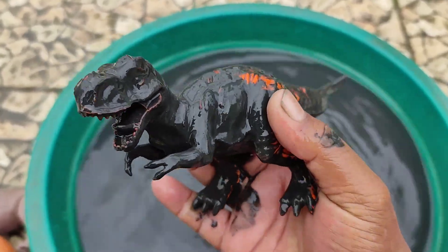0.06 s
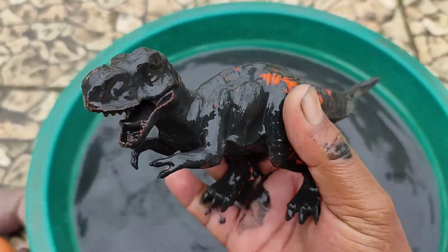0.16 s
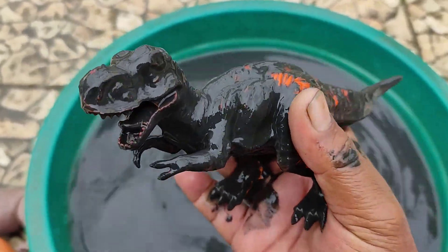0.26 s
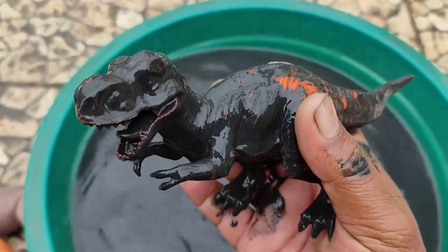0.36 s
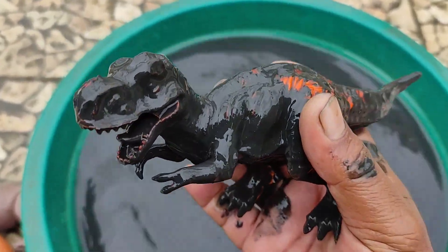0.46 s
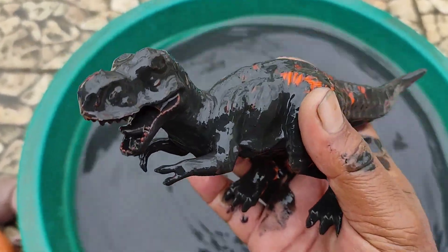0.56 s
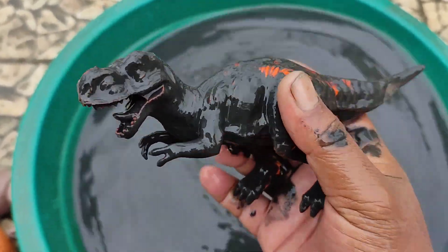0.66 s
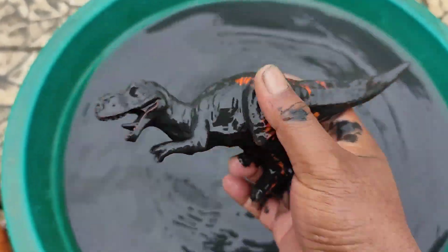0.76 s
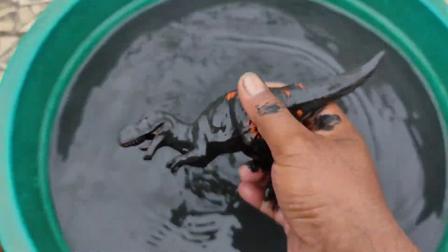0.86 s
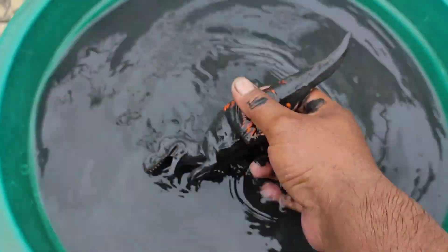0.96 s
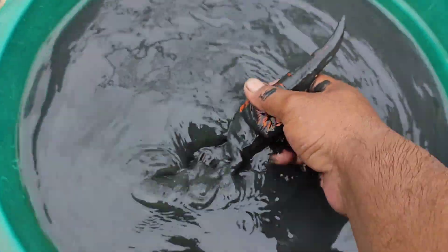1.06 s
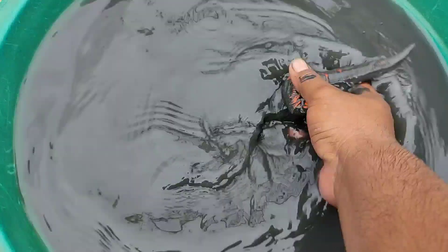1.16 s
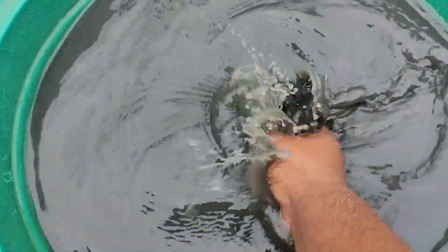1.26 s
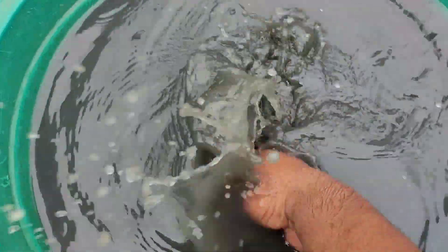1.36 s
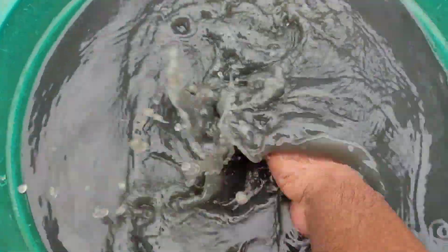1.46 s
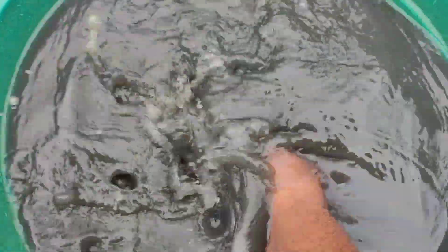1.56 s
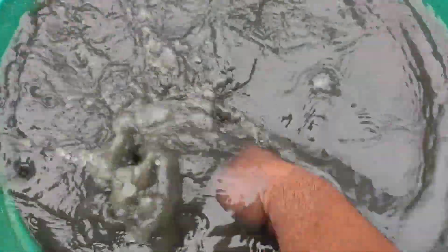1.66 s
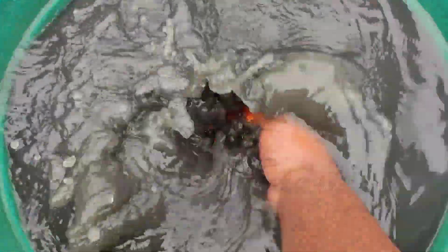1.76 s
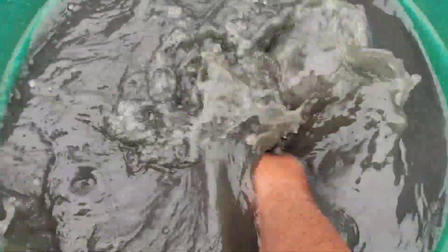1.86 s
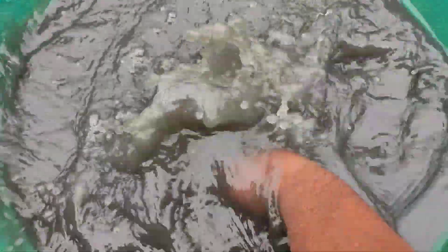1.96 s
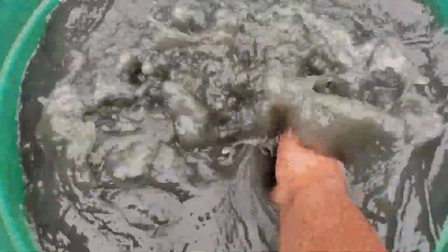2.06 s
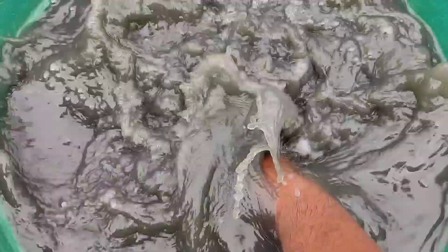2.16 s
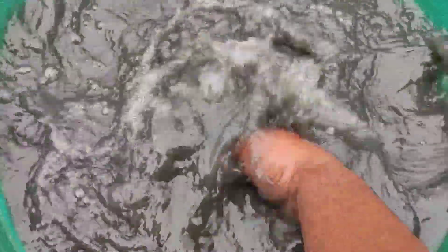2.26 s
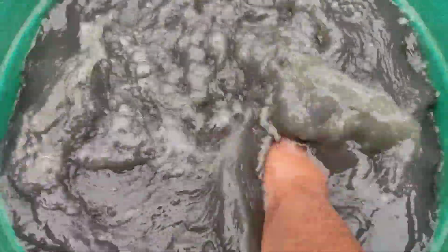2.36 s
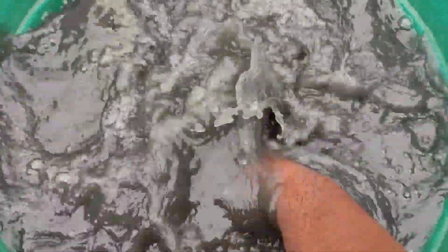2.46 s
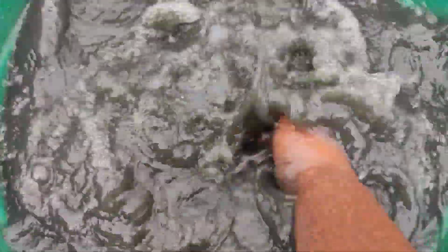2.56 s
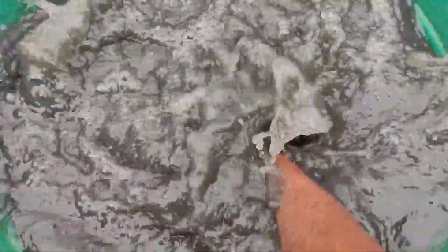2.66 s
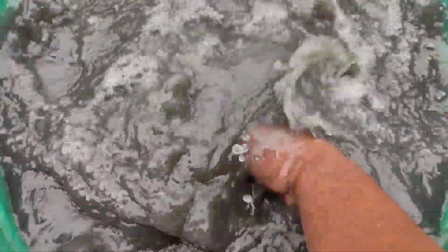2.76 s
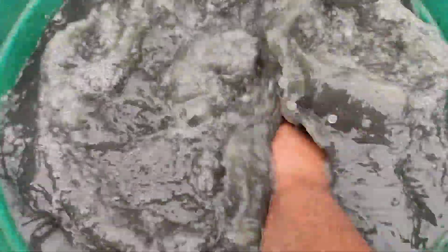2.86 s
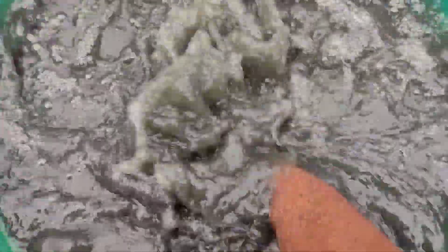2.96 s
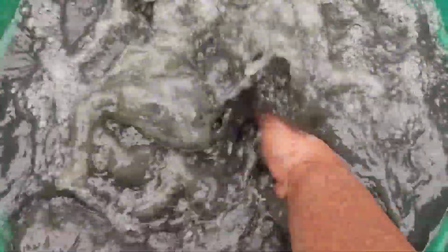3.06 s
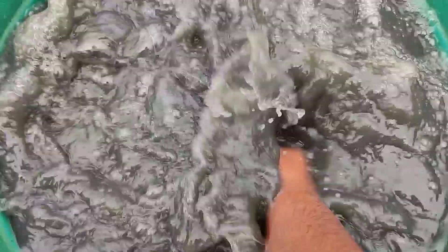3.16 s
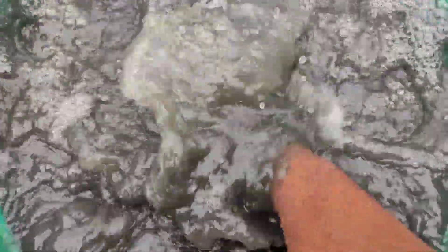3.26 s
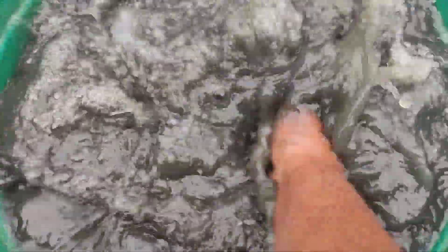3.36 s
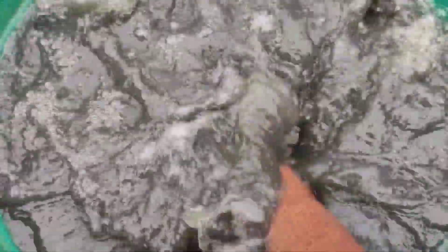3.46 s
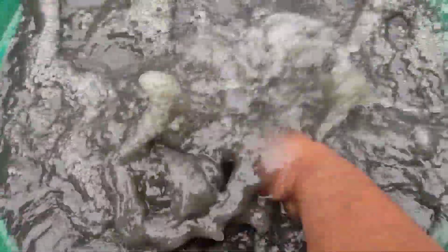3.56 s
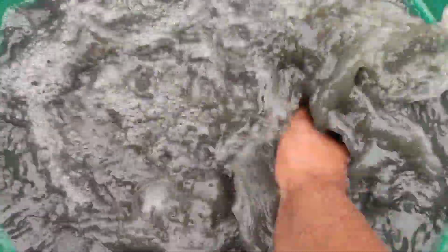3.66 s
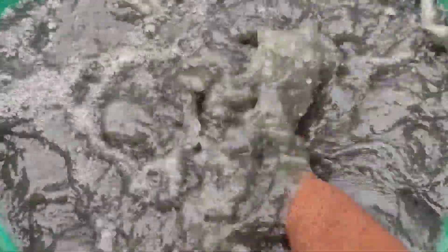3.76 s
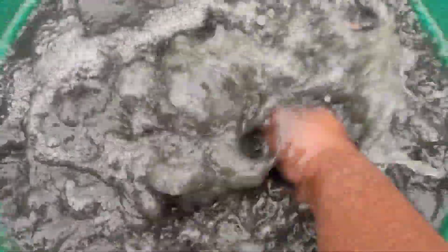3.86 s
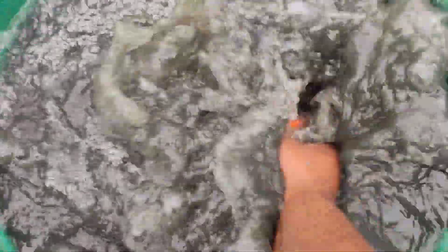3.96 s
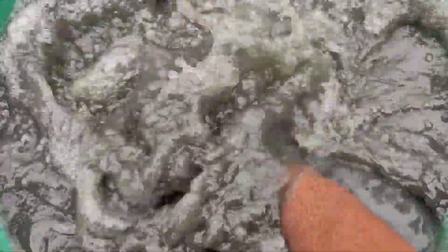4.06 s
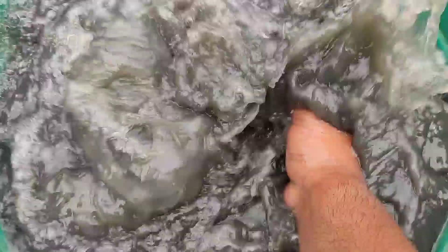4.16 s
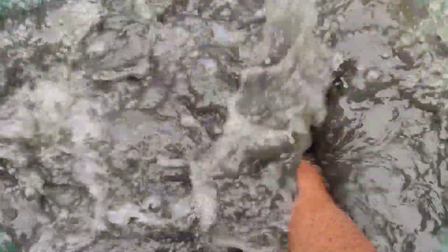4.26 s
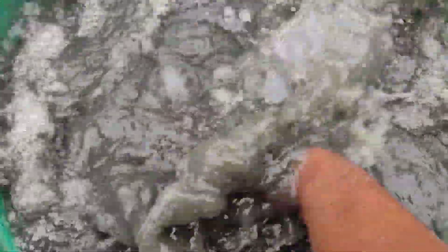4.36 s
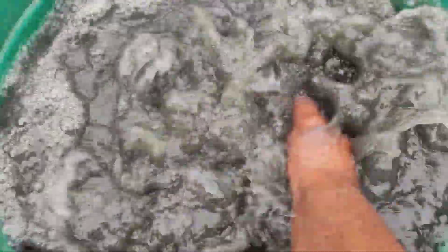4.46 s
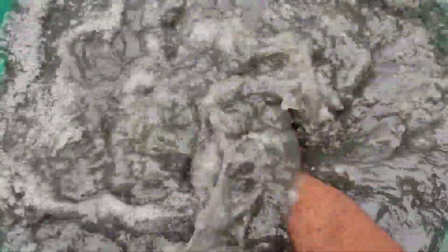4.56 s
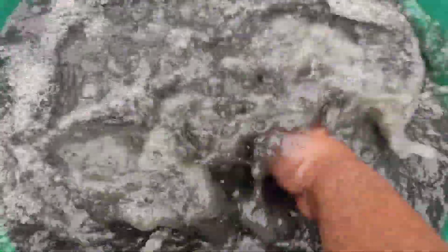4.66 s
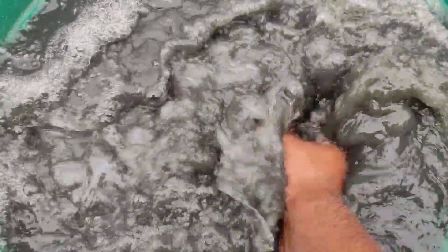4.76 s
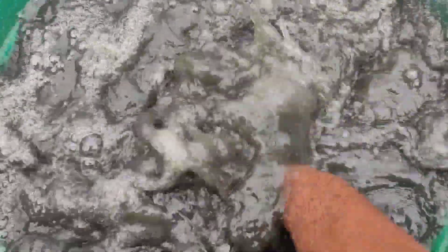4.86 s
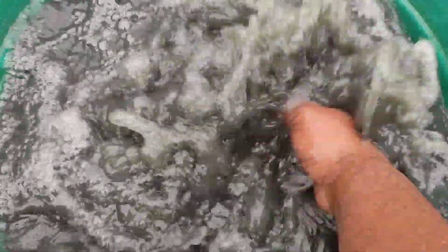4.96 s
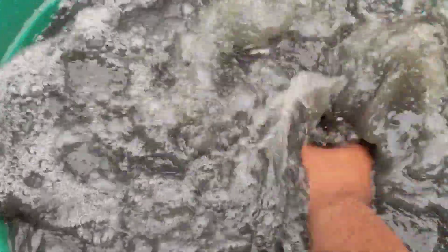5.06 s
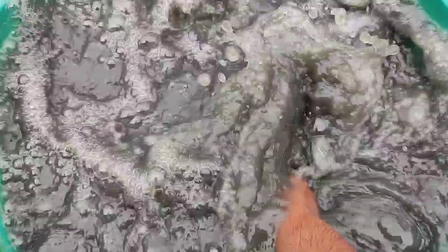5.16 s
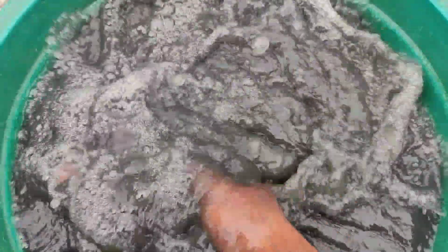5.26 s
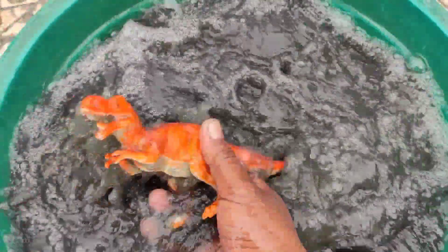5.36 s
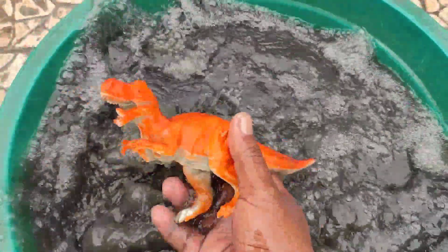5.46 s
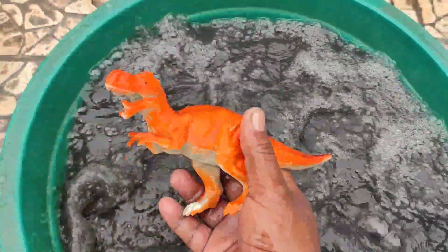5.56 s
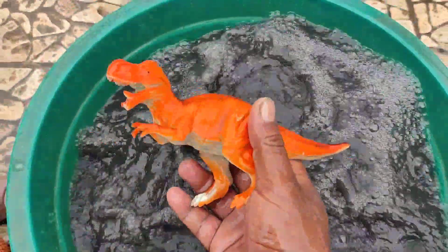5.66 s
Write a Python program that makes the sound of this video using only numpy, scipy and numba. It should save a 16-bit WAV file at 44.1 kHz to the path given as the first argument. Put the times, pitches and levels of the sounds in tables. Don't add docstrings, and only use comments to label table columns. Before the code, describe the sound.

A hand plunges a toy into a basin and churns the water, with bubbling gurgles, sharp slaps and fizzing spray, close up.

```python
import sys
import numpy as np
from scipy import signal
from scipy.fft import rfft, irfft
from scipy.io import wavfile
from scipy.ndimage import map_coordinates
from numba import njit

SR = 44100
rng = np.random.default_rng(int(sys.argv[2]) if len(sys.argv) > 2 else 0)


def transcribe(u):
    v = np.clip(np.atleast_2d(u).T, -1, 1)
    q = np.round(v * 32767).astype(np.int16)
    wavfile.write(sys.argv[1], SR, q)


def boost_factor(decibels):
    exponent = np.asarray(decibels, float) / 20
    return 10 ** exponent


N = 252516
LEFT_LAG_S, LAG_SPREAD_S = 0.00013, 0.00008


def in_time(rows):
    s, *columns = np.transpose(rows)
    return [np.interp(np.arange(N) / SR, s, c) for c in columns]


def at_hz(points, hz):
    point_hz, point_db = np.transpose(points)
    return np.interp(np.log(hz), np.log(point_hz), point_db)


def rms_one(x):
    return x / np.sqrt(np.mean(x ** 2) + 1e-20)


def filtered(x, order, hz, kind):
    return signal.sosfilt(signal.butter(order, hz, kind, fs=SR, output="sos"), x)


def halves(x, hz):
    return [rms_one(filtered(x, 3, hz, kind)) for kind in ("low", "high")]


def drift(per_s):
    r = np.exp(-2 * np.pi * per_s / SR)
    noise = rng.standard_normal(N + SR)
    return rms_one(signal.lfilter([1], [1, -2 * r, r * r], noise)[SR:])


def coloured(spectrum, alike, lag_s):
    hz = np.maximum(np.arange(N // 2 + 1) * SR / N, 1)
    shared, left, right = rfft(rng.standard_normal((3, N)))
    own = np.sqrt(1 - np.clip(alike, 0, 1))
    common = np.sqrt(np.clip(alike, 0, 1))
    late = np.exp(-2j * np.pi * hz * lag_s)
    pair = np.array([common * shared * late + own * left, common * shared + own * right])
    return rms_one(irfft(pair * boost_factor(at_hz(spectrum, hz)), N))


@njit
def ring(rows, n, sr):
    out = np.zeros((2, n))
    for s, height, hz, cycles, rise, swell, lag, left in rows:
        life = cycles / hz
        for side in range(2):
            start = (s + lag * (1 - side)) * sr
            gain = height * (left if side == 0 else 1 / left)
            for i in range(int(start) + 1, min(n, int(start + life * sr))):
                t = (i - start) / sr
                shape = (1 - np.exp(-t * hz / swell)) * np.exp(-np.log(1000) * t / life)
                out[side, i] += gain * shape * np.sin(2 * np.pi * hz * t * (1 + rise * t / life))
    return out


def bubbles(s, level_db, hz, cycles, rise, swell, pan_db):
    spot = rng.standard_normal((len(s), 2))
    swell, cycles = np.maximum(swell, 0.05), np.maximum(cycles, 1.5)
    top = swell * np.log(1 + cycles / swell / np.log(1000))
    peak = (1 - np.exp(-top / swell)) * 1000.0 ** (-top / cycles)
    height = boost_factor(level_db) / peak
    lag_s = LEFT_LAG_S + LAG_SPREAD_S * spot[:, 0]
    left = boost_factor((pan_db + 0.5 * spot[:, 1]) / 2)
    columns = np.broadcast_arrays(s, height, hz, cycles, rise, swell, lag_s, left)
    return ring(np.transpose(columns).copy(), N, SR)


# pitch_hz, level_db (per Hz)
RUMBLE_COLOUR = [(15, -68), (25, -77), (48, -15.5), (177, 1.5), (339, -13), (374, -11.5), (461, -26),
                 (509, -30), (598, -24.5), (1200, -53), (1560, -74), (2640, -120)]
# time_s, level_db
RUMBLE_LEVEL = [
    (0.0, -45),
    (1.15, -43.5),
    (1.47, -52),
    (5.73, -50.5),
]
# pitch_hz, level_db (per Hz)
HISS_COLOUR = [(530, -1), (900, -3.5), (1020, -4), (1190, -8), (1380, -5), (2140, -12), (3650, -11.5),
               (5650, -18.5), (6790, -13), (7660, -12.5), (9660, -3.5), (10400, -19), (11300, -10),
               (14800, -30), (16500, -43)]


def surroundings():
    rumble_db, = in_time(RUMBLE_LEVEL)
    rumble = boost_factor(rumble_db + 5) * coloured(RUMBLE_COLOUR, alike=0.93, lag_s=0)
    hiss = boost_factor(-50) * coloured(HISS_COLOUR, alike=0, lag_s=0)
    return rumble + hiss


# crest_s, spray_db, gurgle_db (against the spray), build_up_s, fall_s
STROKES = [(0.689, -43, -4.5, 0.067, 0.25), (1.12, -46, -4, 0.14, 0.44), (1.35, -42, -6, 0.092, 0.14),
           (1.489, -31, 3, 0.13, .08), (1.661, -35.5, 4.5, .14, 0.16), (1.911, -35, 6.5, 0.18, 0.16),
           (2.181, -35.5, 3.5, 0.18, 0.73), (2.461, -33.5, 4.5, 0.055, 0.15), (2.56, -42, -10, 0.26, 0.096),
           (2.71, -37.5, -2, 0.078, 0.23), (2.83, -39, 2.5, 0.18, 0.3), (2.98, -36, 0, .1, 0.66),
           (3.18, -41.5, 6, 0.37, 1), (3.48, -39, 5, 0.17, 0.11), (3.57, -32, 2, 0.074, 0.12),
           (3.81, -34, 5, 0.19, 0.28), (4.1, -29.5, 3.5, 0.17, 0.087), (4.37, -28.5, 4.5, 0.27, 0.14),
           (4.58, -30.5, 3.5, 0.12, 0.41), (4.88, -31.5, -1, 0.12, 0.18), (5.05, -37.5, 7.5, 0.22, 0.27),
           (5.158, -27.5, 2.5, 0.074, 0.14), (5.5, -43, 4.5, 0.54, 0.29), (5.66, -41, -10, 0.44, .6)]


def strokes(level_db, bed_db):
    slope_db = 20
    power, t = boost_factor(2 * bed_db), np.arange(N) / SR
    for db, (crest_s, _, _, rise_s, fall_s) in zip(level_db, STROKES):
        away = np.maximum((crest_s - t) / rise_s, (t - crest_s) / fall_s)
        power = power + boost_factor(2 * (db - slope_db * away))
    return 10 * np.log10(power)


def swarm(count, spectrum, low_hz, high_hz, cycles, size_db, clump_db, clump_per_s):
    when, pitch, luck, length = rng.random((count, 4)).T
    hz = low_hz * (high_hz / low_hz) ** pitch
    clumps = np.array([drift(clump_per_s) for _ in range(3)])
    clump = map_coordinates(clumps, [2 * pitch, when * (N - 1)], order=1)
    size = -size_db * np.log(np.maximum(luck, 0.01)) + clump_db * clump
    level_db = at_hz(spectrum, hz) + 20 * np.log10(hz) + size
    cycles = cycles * (0.36 + 1.97 * length)
    return rms_one(bubbles(when * N / SR, level_db, hz, cycles, rise=0.16, swell=0.58, pan_db=-1.7))


# pitch_hz, level_db (per Hz)
SPRAY_COLOUR = [(1120, 2.5), (1900, 0.5), (2540, -1), (3240, -0.5), (4610, -3.5), (5000, -7.5), (6620, -8),
                (7180, -13.5), (8680, -2.5), (10000, -8), (11600, -2), (14900, -20.5), (15900, -15),
                (16500, -51)]


def spray_noise(alike):
    return rms_one(filtered(coloured(SPRAY_COLOUR, alike, LEFT_LAG_S), 3, 1100, "high"))


# pitch_hz, level_db (per Hz)
GURGLE_COLOUR = [(71, -56), (120, -18), (167, -5.5), (211, -9), (279, -6), (378, 0.5), (442, 0),
                 (599, -6.5), (711, -1.5), (1370, -8), (1670, -3.5), (1890, -24.5), (2800, -16),
                 (3640, -52), (6160, -120)]
# time_s, slosh_db, depth_db (deep bubbles as the hand sinks in)
SLOSH = [(0.0, -68.5, -7), (0.95, -67, -5), (1.3, -54, 2), (1.56, -49, -21), (1.8, -48.5, 0),
         (2.1, -41, 4.5), (2.9, -40.5, 4.5), (3.5, -40, -1.5), (3.95, -35, 5), (4.45, -36.5, 1.5),
         (5.0, -38.5, 3.5), (5.28, -46, 6), (5.45, -44.5, -23), (5.73, -50, -24)]


def churned_water():
    slosh_db, depth_db = in_time(SLOSH)
    _, crest_db, body_db, _, _ = np.transpose(STROKES)
    gurgle_db = strokes(crest_db + body_db, slosh_db)
    spray_db = strokes(crest_db, slosh_db - 11)
    deep_follows = 0.47
    depth_db = depth_db - (1 - deep_follows) * (gurgle_db - slosh_db)

    gurgle = swarm(count=5000, spectrum=GURGLE_COLOUR, low_hz=140, high_hz=2600, cycles=24,
                   size_db=3, clump_db=2.5, clump_per_s=25)
    wash = coloured(GURGLE_COLOUR, alike=0.85, lag_s=LEFT_LAG_S) * boost_factor(-9 + 2.5 * drift(18))
    deep, shallow = halves(gurgle + wash, 600)

    fizz = swarm(count=22000, spectrum=SPRAY_COLOUR, low_hz=1900, high_hz=12500, cycles=28,
                 size_db=3.5, clump_db=4.5, clump_per_s=22)
    flutter_db = 3 * drift(14) + 2.5 * drift(60) + 2 * drift(150)
    mist = spray_noise(alike=0.45) * boost_factor(-1 + flutter_db)

    low = boost_factor(gurgle_db + 1.3) * (shallow + boost_factor(depth_db) * deep)
    high = boost_factor(spray_db + 1.0) * (fizz + mist)
    return low + high


# start_s, level_db (peak), decay_s (to -60 dB), pan_db (left minus right)
SLAPS = [(1.09, -17.5, 0.016, 8), (1.1397, -17.5, 0.0091, -7), (1.261, -16, 0.0099, -3),
         (1.3249, -13, .032, 1.5), (1.3144, -19, .009, 14), (1.5059, -9, 0.017, 1), (1.9144, -17, 0.031, 5),
         (2.0108, -28.5, 0.024, -6), (2.181, -19.5, 0.021, -2), (2.4504, -22.5, 0.028, -7),
         (2.721, -3.5, 0.008, -9), (2.746, -15, 0.011, -1), (2.813, -13, 0.013, -8.5),
         (3.177, -15, 0.017, -3), (3.211, -11, 0.007, 5), (3.243, -17.5, 0.022, -2),
         (3.3457, -15.5, 0.014, -2), (3.4548, -11.5, .012, 2), (3.6283, -20, 0.027, -8),
         (3.7257, -28, 0.058, .5), (3.8724, -19, .018, 0), (3.9176, -16, 0.011, -11),
         (3.9883, -13, 0.0087, 2), (4.0181, -21.5, 0.015, 6), (4.3396, -16.5, 0.023, -8),
         (4.495, -22, .031, -3), (4.542, -22.5, 0.019, 15), (5.1983, -15.5, 0.017, -5),
         (5.3513, -21, 0.02, 10.5), (5.6494, -22.5, 0.014, 16)]


def slaps():
    dull, bright = halves(spray_noise(alike=0.22), 6000)
    out = np.zeros((2, N))
    for s, db, decay_s, pan_db in SLAPS:
        dull_db = -25 + 11.5 * np.log2(decay_s / 0.01)
        at = slice(round(s * SR), min(N, round((s + decay_s) * SR)))
        t = np.arange(at.stop - at.start) / SR
        shape = boost_factor(db + 5.5 - 60 * t / decay_s) * (1 - np.exp(-t / 0.0028))
        burst = bright[:, at] + boost_factor(dull_db) * dull[:, at]
        out[:, at] += shape * burst * boost_factor([[pan_db / 2], [-pan_db / 2]])
    return out


# start_s, level_db (peak), pitch_hz, cycles (of ringing)
SMALL_BUBBLES = [(1.14, -6, 1330, 11), (1.167, -23, 1410, 22), (1.251, -20.5, 845, 16), (1.264, -20, 1300, 20),
                 (1.305, -18, 1540, 20), (1.314, -17.5, 910, 14), (1.401, -12, 820, 28), (1.43, -15, 1560, 41),
                 (1.469, -6.5, 1390, 9.6), (1.499, -3.5, 1214, 31), (1.614, -14, 1570, 21), (1.638, -9, 1380, 40),
                 (1.661, -8.5, 1027, 33), (1.72, -18, 480, 10.5), (1.778, -15.5, 1480, 17), (1.862, -15, 1160, 62),
                 (1.889, -11, 1190, 24), (1.916, -18, 361, 20), (1.944, 2, 1600, 5.5), (2.004, -15.5, 900, 27),
                 (1.107, -23, 1340, 30),
                 (2.196, -14.5, 1720, 60), (2.462, -19, 794, 18), (2.48, -4.5, 1670, 29), (2.671, -14, 1520, 35),
         (2.986, -15.5, 1510, 25), (3.148, -15.5, 1650, 31), (3.179, -8, 1217, 27), (3.222, -15, 810, 24),
         (3.41, -8.5, 960, 18), (3.91, -9.5, 790, 12), (4.005, -10, 836, 25), (4.139, -18, 848, 15),
         (4.275, -9, 1620, 25), (4.435, -16, 1680, 30), (4.456, -7.5, 1060, 18), (5.124, -12, 1150, 30),
         (5.158, -9, 1090, 14), (5.197, -11, 960, 17), (5.218, -4, 845, 5.9), (5.484, -13.5, 2060, 63),
         (5.506, -21.5, 448, 24), (5.569, -18, 1100, 48), (5.604, -21, 900, 20), (5.652, -16.5, 937, 17)]


def small_bubbles():
    s, db, hz, cycles = np.transpose(SMALL_BUBBLES)
    swell = 0.5 + 0.054 * cycles
    return bubbles(s, db - 8.0, 0.961 * hz, cycles, rise=0.074, swell=swell, pan_db=-0.5)


# start_s, level_db (peak), pitch_hz
DROPLETS = [(1.116, -27, 3000), (1.1391, -30, 2280), (1.316, -22, 4500), (1.4317, -13.5, 2680),
            (1.6605, -22, 3460), (1.779, -13.5, 3770), (1.9468, -16, 2050), (2.4485, -16, 3780),
            (2.7188, -25, 5800), (3.1775, -23, 4400), (3.2223, -20, 2810), (3.4165, -44, 2160),
            (3.5841, -14.5, 2280), (3.626, -20, 4230), (3.7272, -12, 3560), (3.9153, -16.5, 3240),
            (4.32, -20, 4850), (4.3803, -12, 3180), (4.453, -10, 3740), (4.5663, -17, 2180),
            (4.61, -18.5, 2850), (4.87, -17, 2870), (4.8946, -16, 4540), (5.0447, -17, 2230),
            (5.1306, -23, 2140), (5.156, -15, 4440)]


def droplets():
    s, db, hz = np.transpose(DROPLETS)
    return bubbles(s, np.minimum(db, -17) - 3, 0.97 * hz, cycles=28, rise=0.1, swell=2.5, pan_db=0)


# start_s, level_db (peak), pitch_hz, cycles (of ringing)
BLOBS = [(1.386, -14.5, 716, 62), (1.438, -15.5, 480, 47), (1.46, -9.5, 702, 69), (1.625, -20, 437, 29),
         (2.231, -7.5, 447, 18), (2.292, -17.5, 430, 9.1), (2.356, -19, 394, 30), (2.472, -18.5, 536, 24),
         (2.52, -6, 390, 6.8), (2.703, -13, 390, 11), (2.751, -19, 463, 11), (2.84, -14.5, 438, 12),
         (3.139, -19, 364, 21), (3.364, -18.5, 724, 19), (3.638, -15.5, 488, 21), (3.685, -15.5, 414, 7.4),
         (3.814, -17, 480, 21), (3.909, -11, 860, 6.9), (4.213, -16.5, 700, 26), (4.233, -13, 386, 52),
         (4.356, -16.5, 452, 38), (4.452, -15.5, 380, 9.1), (4.654, -20, 426, 40), (4.721, -7.5, 762, 35),
         (4.765, -14, 380, 9.2), (4.894, -20, 523, 16), (4.982, -7.5, 700, 11), (5.033, -10.5, 780, 30),
         (5.103, -18, 380, 23), (5.161, -15, 372, 13)]


def large_bubbles():
    s, db, hz, cycles = np.transpose(BLOBS)
    return bubbles(s, db - 1.5, 0.978 * hz, cycles, rise=0.056, swell=0.8, pan_db=-1.5)


# start_s, level_db (peak), pitch_hz, cycles, rise (of pitch, 0-1)
GULPS = [(2.038, -24, 177, 10.5, 0.26), (2.221, -27, 305, 12.5, 0.2), (2.288, -31, 197, 10, 0.1),
         (2.35, -28, 169, 5.1, 0), (2.514, -24, 288, 5.9, 0.36), (2.562, -24.5, 183, 12, 0.19),
         (2.736, -27, 215, 6.4, 0.16), (3.091, -25, 188, 9.6, 0.23), (3.25, -36, 202, 13, 0.08),
         (3.319, -23.5, 213, 3.8, 0), (3.425, -30, 163.5, 17, 0.42), (3.543, -29, 200, 9.2, 0.26),
         (3.643, -27.5, 164, 25, 0.1), (3.917, -16.5, 204.6, 15.6, 0.3), (4.227, -18.5, 265, 9.6, 0.08),
         (4.325, -33, 250, 13, 0.2), (4.464, -9.5, 167, 9, 0.46), (4.722, -11.5, 232, 4.5, 0),
         (4.987, -22, 170, 6.8, 0.2), (5.151, -37, 286, 10, 0)]


def gulps():
    s, db, hz, cycles, rise = np.transpose(GULPS)
    out = bubbles(s, db - 0.5, 0.923 * hz, cycles, rise, swell=16.0, pan_db=-1.0)
    return filtered(out, 2, 95, "high")


# pitch_hz, balance_db (left minus right)
PORT_SHADING = [(60, 22), (150, 0.5), (380, -0.5), (950, 0.5), (2380, 0.5), (5980, -6.5), (15000, 8)]


def scene():
    far = surroundings()
    near = churned_water() + slaps() + small_bubbles() + droplets() + large_bubbles() + gulps()
    hz = np.maximum(np.arange(N // 2 + 1) * SR / N, 1)
    shade_db = at_hz(PORT_SHADING, hz) / 2
    return irfft(rfft(near) * boost_factor([shade_db, -shade_db]), N) + far


def band_limit(x):
    return signal.sosfilt(signal.butter(12, 16650, fs=SR, output="sos"), x)


def record(dry):
    mix = filtered(dry, 2, 40, "high")
    mix = filtered(mix, 8, 15700, "low")
    return band_limit(mix)


dry = scene()
out = record(dry)
transcribe(out)
```